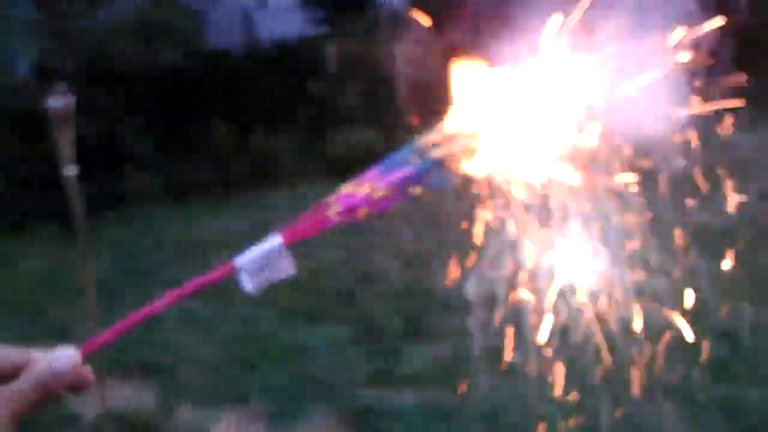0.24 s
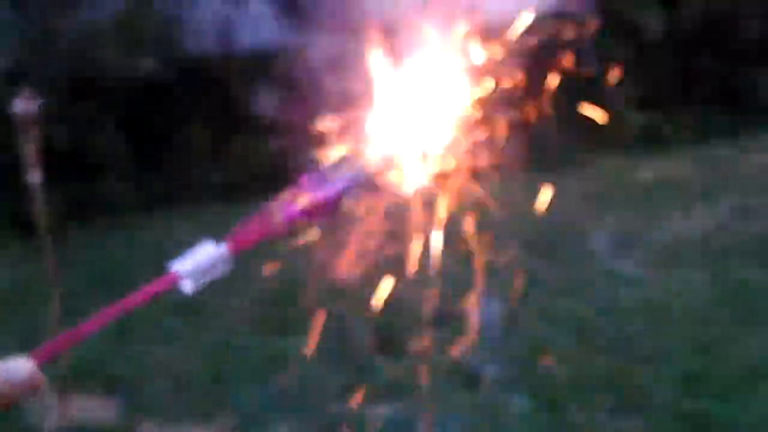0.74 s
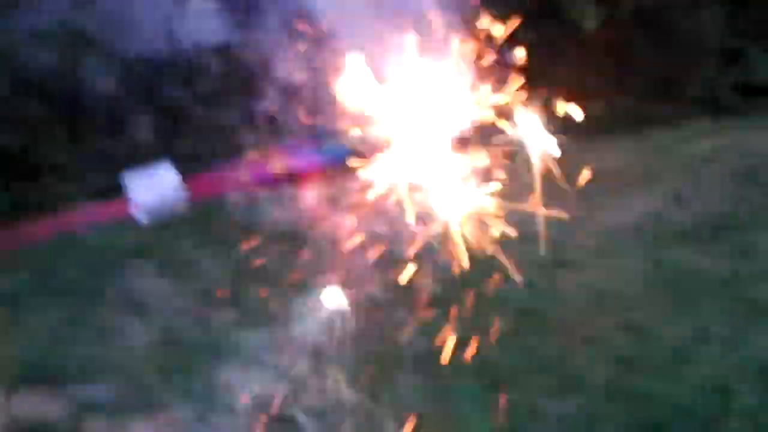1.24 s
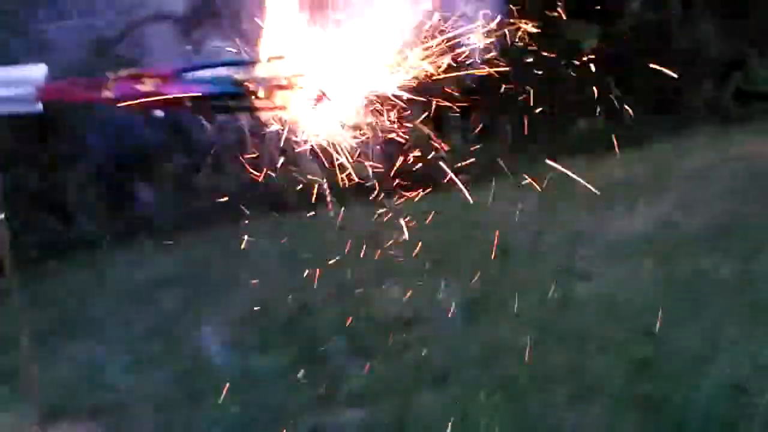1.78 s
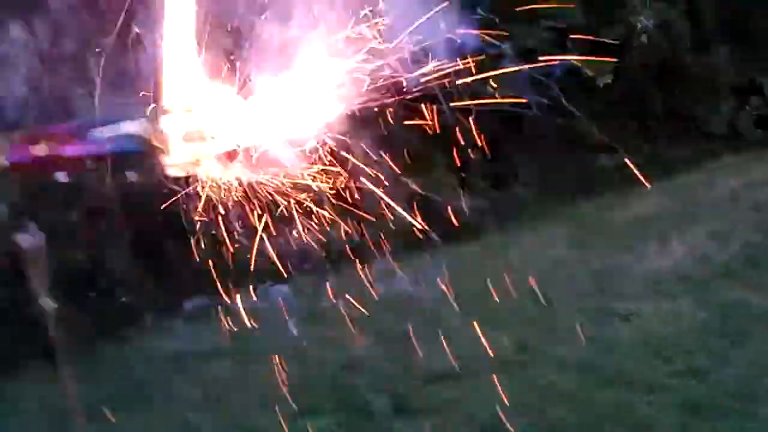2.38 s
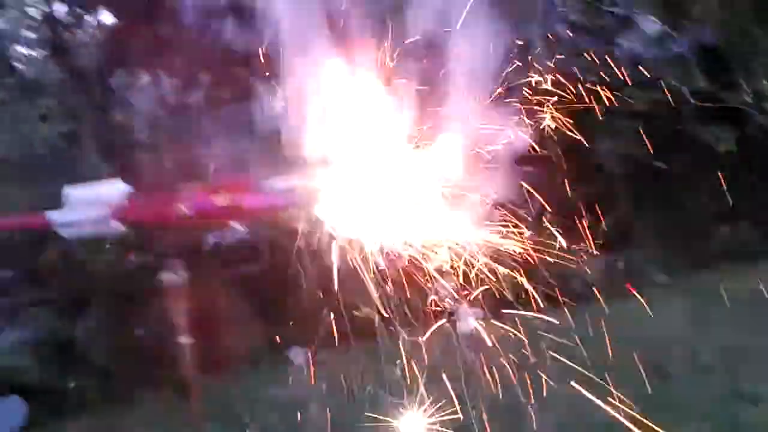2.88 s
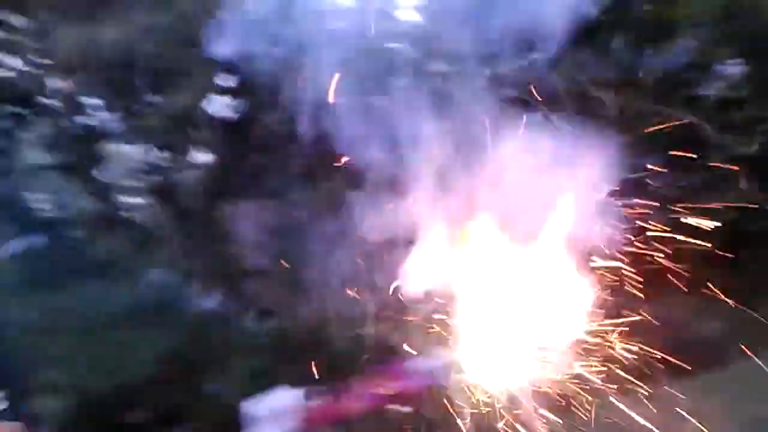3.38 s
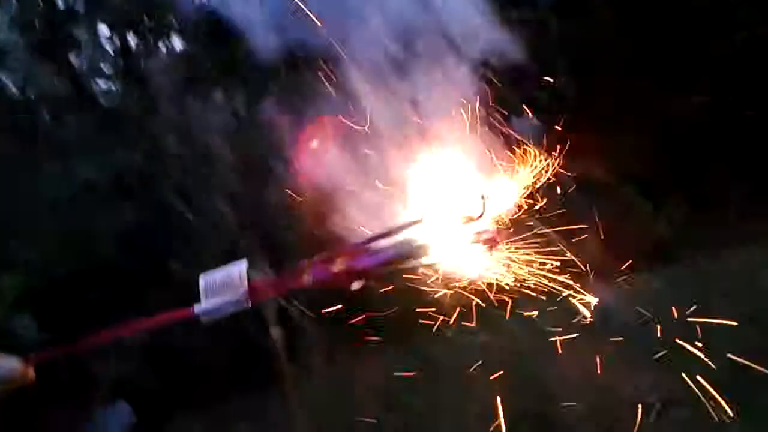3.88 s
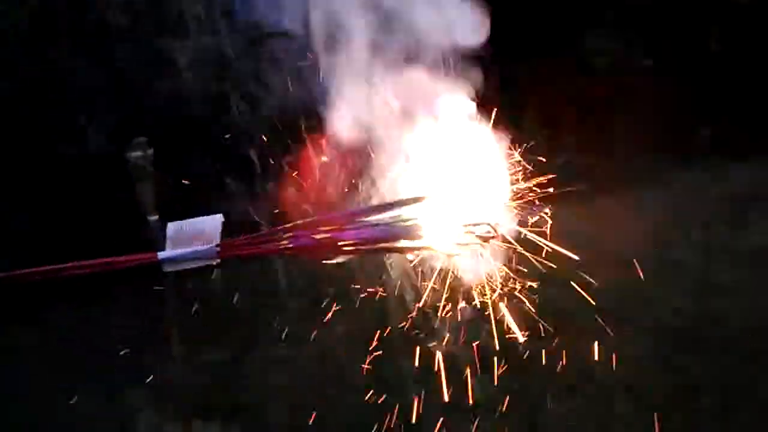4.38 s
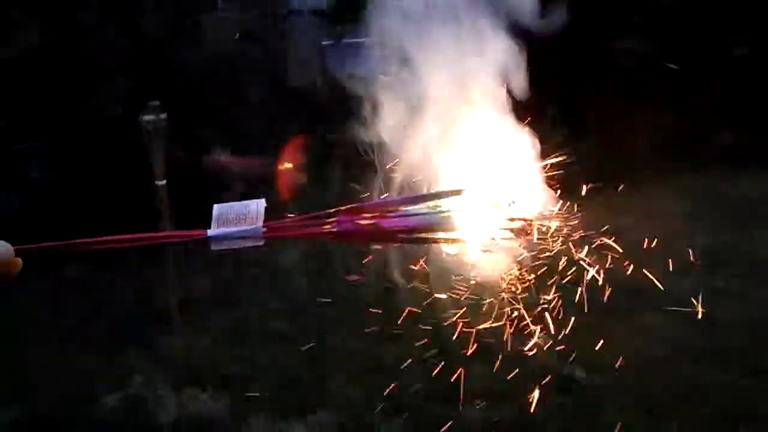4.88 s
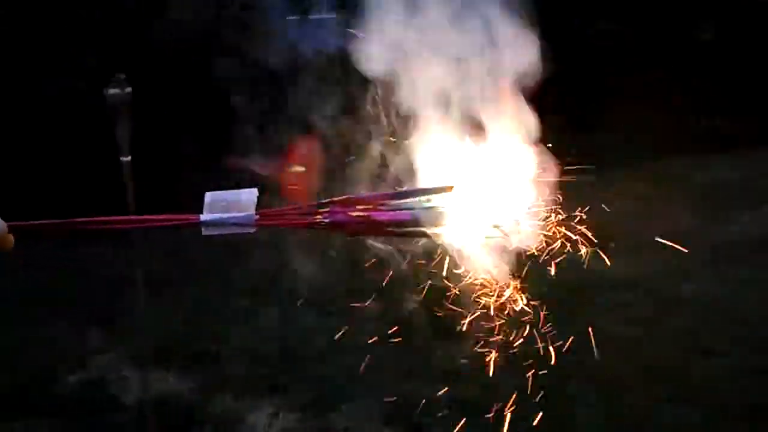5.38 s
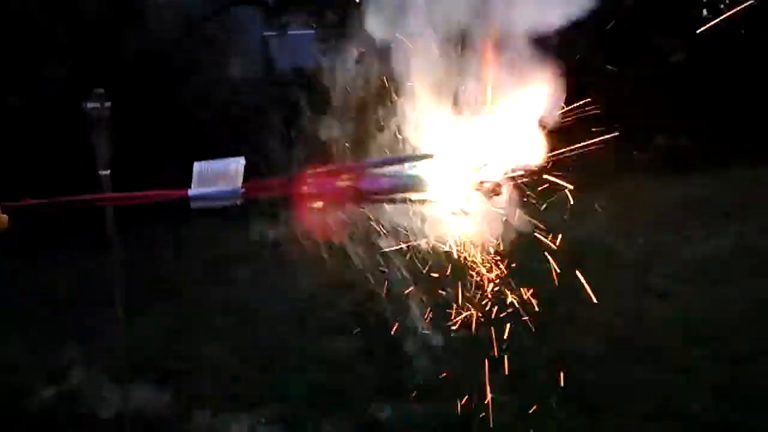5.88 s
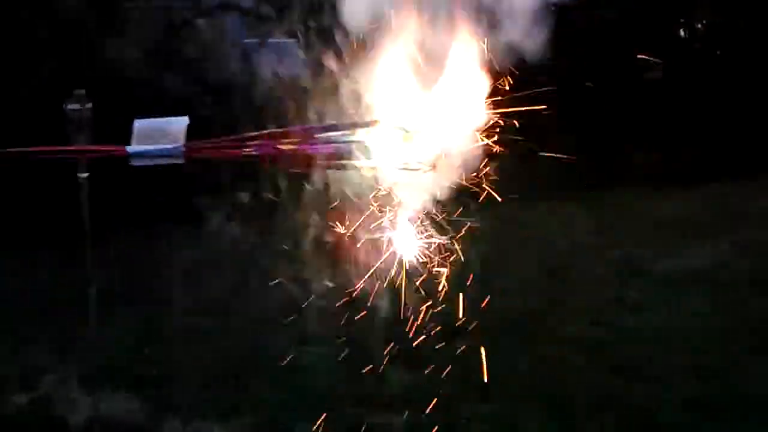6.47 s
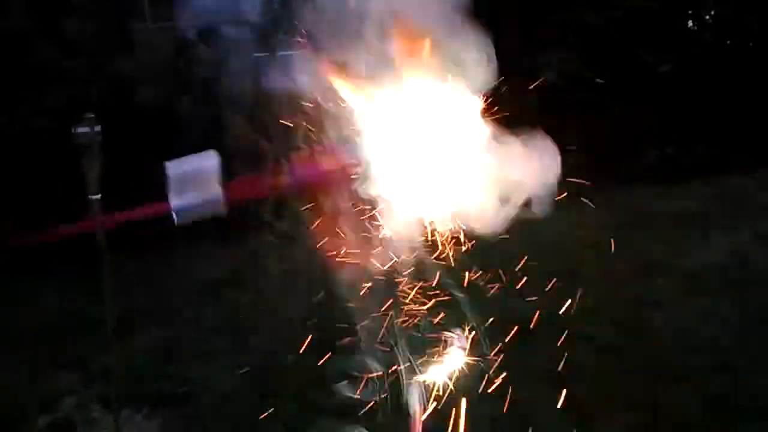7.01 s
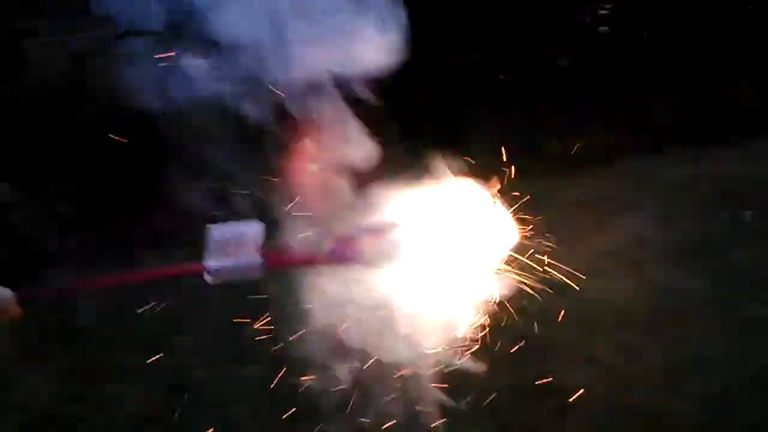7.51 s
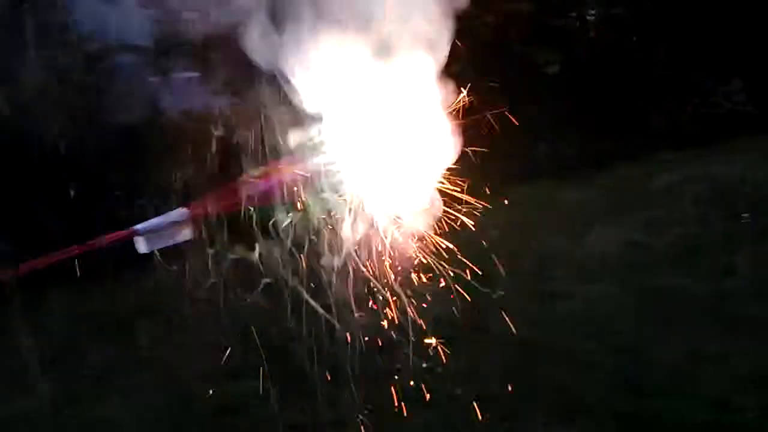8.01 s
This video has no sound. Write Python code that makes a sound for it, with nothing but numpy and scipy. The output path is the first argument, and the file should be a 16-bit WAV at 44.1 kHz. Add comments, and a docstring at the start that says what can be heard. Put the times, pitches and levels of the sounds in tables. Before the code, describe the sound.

Already burning at the start, a handful of sparklers gives a steady, high, gritty fizz and soft low rush. Ragged cracks and pops burst irregularly, thickest early, more widely spaced in the middle, and frequent again in the last second or so, when the hiss dips and recovers unevenly. Close single-microphone outdoor sound, centred and without room reverberation, shrill on top, with the loudest snaps flattened by overload and a barely audible distant rumble.

```python
"""A bundle of large sparklers burns an arm's length from a small single microphone in a garden.
From the start random noise fizzes and roars softly, random clicks snap as sparks, and a distant hum lies below.
Bigger grains, short ragged pulses with crack, pop and thud, crowd the first 3 s and thin out until about 6.9 s.
They then crowd again, while the burn falters more deeply, until shortly before the end at 8.25 s.
Throughout, the microphone port rings near 8.5 kHz, echoes and notches move, and overloaded peaks are cut flat."""
import sys
import numpy as np
from scipy import signal
from scipy.fft import rfft, irfft
from scipy.io import wavfile
from scipy.ndimage import map_coordinates

SR = 44100
rng = np.random.default_rng(int(sys.argv[2]) if len(sys.argv) > 2 else 0)


def voltage_ratio(decibels):
    """Convert decibels (scalar or array-like) to amplitude ratios, 20 dB per decade."""
    exponent = np.asarray(decibels, float) / 20
    return 10 ** exponent


def wav_record(signal):
    """Record a signal, one row per channel, as 16-bit PCM in the file named by sys.argv[1]."""
    frames = np.transpose(np.atleast_2d(signal))
    bounded = np.clip(frames, -1, 1)
    # unit amplitude maps onto the largest positive 16-bit level
    quanta = np.round(bounded * 32767).astype(np.int16)
    wavfile.write(sys.argv[1], SR, quanta)


N = 363825   # samples, 8.25 s

# the large bursting grains, before the echoes: start_s [s], crack, pop and thud peak_db [dB]
LARGE_GRAINS = [(0.0176, 2, -32, -46), (0.0584, 0, -18, -36), (0.106, 5, -15, -23), (.1449, 6, -34, -51),
                (0.2005, -18, -8, -17), (.335, -22, -11.5, -54), (0.4135, 8, -4.5, -17),
                (0.4582, 7, -3.5, -12.5), (.472, 3, -20, -19), (0.4945, 10, -3, -23), (.5333, 3, -3, -10),
                (0.6063, -9, -17, -23), (0.636, -4, -12, -21), (0.6607, 11, -1, -17),
                (0.6856, 2, -5.5, -12), (0.6886, 10, -13, -23), (0.729, -13, -18, -19),
                (.7448, -9, -11, -26), (0.7722, 5, -11, -22), (.79, 3, -9, -21), (0.8697, 9, -9.5, -16),
                (0.8819, 9, -3, -17), (.909, -15, -5.5, -23), (.953, -5, -8, -16), (.958, 13, -3, -13),
                (1.0106, 5, -9, -22), (1.0173, -6, -11, -27), (1.1093, -14, -20, -15),
                (1.1341, 10, -4, -12.5), (1.1522, 3, -12, -18), (1.1962, 6, -7, -25),
                (1.209, -9, -6.5, -18), (1.268, 10.5, -10, -30), (1.3243, 11, -3.5, -20),
                (1.352, 11, -7, -22), (1.403, 6, -6, -17), (1.4404, 2, -15, -20), (1.4891, 13, -3.5, -23),
                (1.5113, 11, -25, -45), (1.598, 1, -6, -23), (1.614, -6, -9, -35), (1.619, 3, -6, -22),
                (1.643, 0, -9, -17.5), (1.682, 11, 0.5, -13.5), (1.7122, 3, -12, -20),
                (1.745, 10, -25, -42), (1.8023, 0, -11.5, -18), (1.8758, 6, -8, -28), (1.8816, 9, -10, -24),
                (1.9337, -12, -15, -17), (1.9621, 0, -5, -17), (1.9688, -1, -12, -20),
                (2.0067, -8, -9, -26), (2.0271, 11.5, -3.5, -23), (2.1312, -24, -10, -30),
                (2.1954, -4, -9, -39), (2.2891, 2, -16, -35), (2.3117, 17, -24, -21), (2.32, 15, -5, -18),
                (2.353, 5, -36, -42), (2.3716, -12, -11, -23), (2.3907, -6, -13, -17), (2.4172, 3, -7, -18),
                (2.489, -1, -11, -22), (2.527, -11, -11, -26), (2.5517, 0, -10, -23),
                (2.5602, -4, -10, -17), (2.566, 14.5, -8, -15.5), (2.6594, -4, -22, -48),
                (2.798, 5, -49, -54), (2.79, -6, -11, -31), (2.839, 9, -7, -23), (2.8867, -17, -12, -25),
                (2.915, 1, -24, -49), (2.926, 2, -6, -23), (2.9335, 13, -11, -14), (2.9804, 3, -8, -18),
                (3.0762, 10, -6.5, -20.5), (3.088, 7, -21, -38), (3.362, -4, -7.5, -13),
                (3.4881, 10, -6, -21), (3.657, 5, -8.5, -25), (3.6693, 2, -10.5, -17.5),
                (3.807, 7, -12, -25), (3.8325, 13, -4, -24), (3.9016, -3, -7.5, -21), (3.933, 10, -12, -30),
                (3.9953, 5, -13, -31), (4.031, 2, -8, -22), (4.0424, 9, -12, -18), (4.147, -1, -8, -12.5),
                (4.3554, 9, -5.5, -24), (4.458, 7, -5, -19), (4.5868, 6.5, -8, -18), (4.6956, -9, -13, -22),
                (4.8563, 7, -6.5, -20), (5.014, 2, -8, -35), (5.0432, 15, -3.5, -14), (5.111, -2, -10, -26),
                (5.2102, 5, -11, -28), (5.2405, 9, -5, -25), (5.2599, -12, -7, -20), (5.2909, 10, -10, -23),
                (5.339, 0, -22, -24), (5.4097, 11, -8, -23), (5.494, -3, -7.5, -20), (5.5958, 11, -12, -18),
                (5.6022, 8, -12, -26), (5.7455, -7, -22, -21), (5.8162, 1, -8.5, -15.5),
                (5.8759, 8, -6, -17), (5.903, 8.5, -11, -21), (6.0228, 10, -7.5, -21), (6.129, 1, -15, -24),
                (6.1947, 5, -17, -31), (6.2756, 6, -22, -43), (6.566, 2, -13.5, -29), (6.6124, 5, -14, -26),
                (6.621, -14, -9.5, -13.5), (6.869, -1, -7.5, -20.5), (6.9444, -20, -10, -40),
                (6.959, -6, -8, -16), (6.9702, 5, -3.5, -13), (6.9936, 0, -14, -22), (7.0795, -4, -13, -25),
                (7.1054, -5, -13, -22), (7.166, 6, -12, -26), (7.2132, -10, -8.5, -47),
                (7.239, 3, -12, -18), (7.2506, -17, -13, -44), (7.2995, 1, -11, -32), (7.3314, 5, -19, -26),
                (7.3704, 1, -5.5, -12.5), (7.653, 12, -6.5, -18.5), (7.6619, 17, -9, -20),
                (7.744, 5, -10, -28), (7.865, 2, -25, -40), (7.87, -7, -11, -17), (7.961, -13, -14, -23),
                (8.0063, 3, -10, -27), (8.1293, -2, -11, -23), (8.136, -9, -10, -27),
                (8.1527, -5, -18, -42), (8.1692, -5, -19, -30), (8.194, -20, -14, -47)]
# the angle to the flame, as the low notch it causes before a small random waver: time_s [s], notch_hz [Hz]
FLAME_ANGLE = [(0, 3670), (.33, 3540), (.66, 3270), (1.0, 3420), (1.65, 3160), (2.0, 3060), (2.64, 3030),
               (3.0, 3340), (3.6, 3530), (3.96, 3320), (4.3, 3600), (4.95, 3700), (5.6, 3520), (6.2, 3500),
               (6.6, 3300), (7.26, 3510), (7.59, 3780), (7.92, 3340), (8.25, 3350)]
# tone colour of fizz and cracks, with the port's ring: pitch_hz [Hz], relative level_db [dB per Hz]
FIZZ_COLOUR = [(1500, -33), (2500, -13.5), (3400, -15), (4300, -12), (5050, -10), (6350, -14.5), (7690, -3),
               (8430, 2), (8960, 0.5), (10300, -3), (12300, -9.5), (15500, -15)]
# tone colour of the puffs and pops: pitch_hz [Hz], relative level_db [dB per Hz]
PUFF_COLOUR = [(250, -44.5), (560, -26), (780, -6), (1340, -8.5), (2120, -1), (3360, -10.5), (5000, -30),
               (6500, -24), (8000, -31)]
# tone colour of the dull thuds: pitch_hz [Hz], relative level_db [dB per Hz]
THUD_COLOUR = [(50, -31.5), (120, -6), (290, 1.5), (400, 0.5), (600, -12.5), (1200, -28.5)]


def vigour():
    """The slow burn sets the fizz level (dB); flares and falters are smooth bumps, and chance adds sputter."""
    # the slow burn: time_s [s], fizz level_db before bumps and sputter [dB]
    slow_burn = [(0, -15), (.6, -15), (.9, -15.5), (1.7, -14.5), (2.2, -14), (2.7, -16), (3.3, -14),
                 (3.7, -16), (4.1, -14.5), (5.1, -13.5), (6.1, -15), (6.45, -16), (6.8, -16.5),
                 (7.4, -14.5), (8.25, -15)]
    # flare-ups (+) and falters (-): middle_s [s], reach to either side_s [s], change_db [dB]
    flares = [(0.0, .08, 0), (0.083, 0.11, 2), (0.234, 0.084, 3.5), (0.402, 0.071, 1.5), (0.786, 0.093, -3),
              (1.053, 0.078, -2), (1.2, .12, 1), (1.28, 0.072, -2), (0.556, 0.06, 1.5), (1.66, .12, 1.5),
              (2.007, 0.14, 0), (2.69, 0.097, -1.5), (2.93, .1, 0.5), (4.028, 0.087, 1), (5.797, 0.11, 1.5),
              (2.316, 0.12, -2), (2.4, 0.11, 1), (3.045, 0.12, -1.5), (3.35, 0.075, 1.5), (3.424, .08, -2),
              (4.307, 0.14, -1.5), (4.634, 0.058, -2.5), (5.108, 0.046, 1), (5.282, .08, 1),
              (5.36, 0.06, -3), (5.523, 0.079, -3.5), (5.685, 0.058, -1.5), (6.553, 0.083, 3),
              (6.92, .15, 2.5), (7.075, 0.062, -3.5), (7.225, 0.04, -6.5), (7.358, 0.028, -5),
              (7.504, .1, -1), (7.56, 0.14, -4.5), (7.804, .07, -5.5), (7.64, .04, -1.5),
              (7.87, 0.083, 3.5), (8.14, 0.067, 1.5), (7.958, 0.052, -3), (8.08, 0.044, -2)]
    t = np.arange(N) / SR
    level_db = in_time(slow_burn)[0]
    for middle_s, reach_s, change_db in flares:
        first = max(round((middle_s - reach_s) * SR), 0)
        near = slice(first, round((middle_s + reach_s) * SR))
        bump = np.cos(np.pi / 2 * (t[near] - middle_s) / reach_s) ** 2
        level_db[near] += change_db * bump
    return level_db + 0.54 * drift(6.5)


def fizz(level_db, spark_share=0.33):
    """Fine gas hiss that sputters a little, with distinct snaps of sparks coming in clumps."""
    flicker = voltage_ratio(0.5 * drift(25)) * voltage_ratio(2.0 * drift(246))
    hiss = rng.standard_normal(N) * flicker
    snaps_per_s = 600 * voltage_ratio(4.0 * drift(30))
    sparks = dulled(clicks(snaps_per_s, spread_db=3.5), hz=9100)
    # the share is one of power, hence the square roots
    mix = np.sqrt(1 - spark_share) * rms_one(hiss) + np.sqrt(spark_share) * rms_one(sparks)
    return voltage_ratio(level_db) * rms_one(coloured(mix, FIZZ_COLOUR))


def roar_level(fizz_db):
    """The roar follows the burn; every large pop stokes it at once and it dies back."""
    calm_db, follows = -34, 0.4        # level at mean vigour; share of the fizz's swing
    stoked_db, stoked_s = -23.5, 0.022   # roar added by a full-scale pop; its power's fall to about a third
    start_s, _, pop_db, _ = np.transpose(LARGE_GRAINS)
    power = np.zeros(N)
    power[np.round(start_s * SR).astype(int)] = voltage_ratio(pop_db + stoked_db) ** 2
    fall = np.exp(-1 / (stoked_s * SR))
    stoked = signal.lfilter([1], [1, -fall], power + 1e-18)
    calm = voltage_ratio(calm_db + follows * (fizz_db - fizz_db.mean())) ** 2
    return 10 * np.log10(calm + stoked)


def roar(level_db, puff_share=0.14, thud_db=-8.0):
    """The flame's low rush, finely flickering, with small random puffs in it."""
    # tone colour of the rush: pitch_hz [Hz], relative level_db [dB per Hz]
    rush_colour = [(60, -24), (120, -6), (285, -13.5), (400, -8), (560, -12.5), (780, -1), (1040, -0.5),
                   (1300, -2), (2080, 6), (2800, -3.5), (4000, 3.5), (5200, -44)]
    flicker = voltage_ratio(0.7 * drift(12)) * voltage_ratio(1.7 * drift(69))
    rush = rng.standard_normal(N) * flicker
    rush = coloured(rms_one(rush), rush_colour)
    small = clicks(250 * voltage_ratio(4.3 * drift(15)), spread_db=9.0)
    puffs = coloured(small, PUFF_COLOUR) + voltage_ratio(thud_db) * coloured(small, THUD_COLOUR)
    return voltage_ratio(level_db) * (np.sqrt(1 - puff_share) * rush + np.sqrt(puff_share) * puffs)


def all_grains():
    """The large grains and the mostly smaller chance ones, as rows of the same kind."""
    count = 90
    mean_db, spread_db = (-5.5, -26.5, -42), (5.5, 7, 9.5)   # peaks of crack, pop, thud
    peaks_db = mean_db + rng.standard_normal((count, 3)) * spread_db
    start_s = rng.random(count) * N / SR
    return np.vstack([np.column_stack([start_s, peaks_db]), LARGE_GRAINS])


def bursts(front=14.4, shock=184.0):
    """Each grain gives a bright crack, and a mid pop and dull pressure thud from one train of pushes."""
    start_s, crack_db, pop_db, thud_db = np.transpose(all_grains())
    draws = rng.standard_normal((len(start_s), 2, 512))
    pushes = np.abs(draws[:, 1]) ** 5   # all of one sign, a few large
    pushes[:, 0] = shock                # the first push is the shock front
    ragged = draws[:, 0] * np.abs(draws[:, 1])
    ragged[:, 0] = front
    cracks = spits(start_s, crack_db, 0.0035, dulled(ragged, hz=4140), FIZZ_COLOUR)
    pops = spits(start_s, pop_db, 0.002, pushes, PUFF_COLOUR)
    thuds = spits(start_s, thud_db, 0.0022, pushes, THUD_COLOUR)
    return cracks + pops + thuds


def spits(start_s, peaks_db, decay_s, draws, spectrum):
    """Each burst is a short spit: a sharp front and ragged after-pulses that die away."""
    t = np.arange(draws.shape[1]) / SR
    fading = draws * np.exp(-t / decay_s)
    shapes = signal.fftconvolve(fading, response(spectrum)[None, :1024], axes=1)
    shapes *= (voltage_ratio(peaks_db) / np.abs(shapes).max(axis=1))[:, None]
    out = np.zeros(N + shapes.shape[1])
    for s, shape in zip(start_s, shapes):
        i = round(s * SR)
        out[i:i + len(shape)] += shape
    return out[:N]


def hollows(x, ratio=1.885):
    """Two narrow notches in the steady burn, wandering together; bursts fly off elsewhere and fill them."""
    low_hz = in_time(FLAME_ANGLE)[0] * voltage_ratio(0.15 * drift(8))
    once = moving_notch(x, low_hz, deep_hz=113, wide_hz=820)
    return moving_notch(once, ratio * low_hz, deep_hz=448, wide_hz=880)


def moving_notch(x, hz, deep_hz, wide_hz, size=256):
    """Cuts a dip with a zero pair and limits its width with a pole pair, retuned block by block."""
    zero, pole = np.exp(-np.pi * deep_hz / SR), np.exp(-np.pi * wide_hz / SR)
    out, state = np.zeros(N), np.zeros(2)
    for i in range(0, N, size):
        turn = -2 * np.cos(2 * np.pi * hz[i] / SR)
        b = [1, zero * turn, zero ** 2]
        a = [1, pole * turn, pole ** 2]
        out[i:i + size], state = signal.lfilter(b, a, x[i:i + size], zi=state)
    return out


def near_echoes(x):
    """Echoes off hand and housing, a fraction of a millisecond late; delays shift as the flame moves."""
    # the echoes: delay [cycles of the echo notch], gain [ratio, before the final scaling]
    echoes = [(2.537, 0.19), (1.493, 0.35)]
    echo_hz = 3.043 * in_time(FLAME_ANGLE)[0]   # echo notch over low notch
    out = x.copy()
    for cycles, gain in echoes:
        late = np.arange(N) - cycles * SR / echo_hz
        out += gain * map_coordinates(x, [late], order=3)
    return out / np.sqrt(1 + np.sum(np.array(echoes)[:, 1] ** 2))


def hum():
    """A faint hum, wavering in pitch and level, and a dull, slowly swelling rumble from far off."""
    # tone colour of the rumble: pitch_hz [Hz], relative level_db [dB per Hz]
    rumble_colour = [(18, -31), (35, -5), (65, 3), (95, -5.5), (130, 0), (250, -2), (600, -27)]
    hum_hz, hum_db, rumble_db = 116.7, -51.5, -46   # centres of the wavering
    tone = np.sin(2 * np.pi * hum_hz * np.arange(N) / SR + 1.45 * drift(2.5))
    rumble = coloured(rng.standard_normal(N), rumble_colour)
    return voltage_ratio(hum_db + 3.4 * drift(1.5)) * tone + voltage_ratio(rumble_db + 1.6 * drift(0.53)) * rumble


def clicks(per_s, spread_db):
    """Random clicks of either sign, a few much larger than the rest; rms 1."""
    sizes_db = spread_db * np.minimum(rng.exponential(1, N), 4)
    sizes = voltage_ratio(sizes_db) * rng.choice([-1, 1], N)
    return rms_one(sizes * (rng.random(N) < per_s / SR))


def dulled(x, hz):
    """One-pole low-pass: a snap has a finite rise, so its very top is weaker than that of the hiss."""
    r = np.exp(-2 * np.pi * hz / SR)
    return signal.lfilter([1 - r], [1, -r], x)


def response(spectrum, size=8192):
    """The impulse response of a spectrum, with its energy as early as possible (minimum phase); energy 1."""
    hz, db = np.transpose(spectrum)
    bins_hz = np.arange(size // 2 + 1) * SR / size
    log_gain = np.interp(np.log(bins_hz + 1), np.log(hz), db) * np.log(10) / 20
    # folding the cepstrum (transform of the log gain) forward leaves nothing before time zero
    cepstrum = irfft(log_gain)
    cepstrum[1:size // 2] *= 2
    cepstrum[size // 2 + 1:] = 0
    pulse = irfft(np.exp(rfft(cepstrum)))[:size // 2]
    return pulse / np.sqrt(np.sum(pulse ** 2))


def coloured(x, spectrum):
    """Gives x the tone colour of a spectrum."""
    return signal.oaconvolve(x, response(spectrum))[:N]


def drift(rate_hz):
    """Smooth random wandering with spread 1: noise low-passed twice, made at an eighth of the sample rate."""
    r = np.exp(-16 * np.pi * rate_hz / SR)
    noise = rng.standard_normal(N // 8 + 4002)
    slow = signal.lfilter([1], [1, -2 * r, r * r], noise)[4000:]   # drops the filter's settling
    return np.interp(np.arange(N) / 8, np.arange(len(slow)), rms_one(slow))


def in_time(rows):
    """Joins table points by straight lines: one value per sample for each column."""
    s, *columns = np.transpose(rows)
    return [np.interp(np.arange(N) / SR, s, c) for c in columns]


def rms_one(x):
    """Scales to rms 1."""
    return x / np.sqrt(np.mean(x ** 2) + 1e-20)


def scene():
    """One microphone feeds both channels."""
    fizz_db = vigour()
    burn = hollows(fizz(fizz_db) + roar(roar_level(fizz_db)))
    heard = near_echoes(burn + bursts()) + hum()
    return np.array([heard, heard])


def top_cut(x):
    """Nothing passes above the cut-off."""
    return signal.sosfilt(signal.butter(12, 15690, fs=SR, output="sos"), x)


def record(dry):
    """The converter overloads: peaks beyond its limit are cut flat."""
    clipped = np.clip(dry, -0.83, 0.83)
    return top_cut(clipped)


dry = scene()
out = record(dry)
wav_record(out)
```